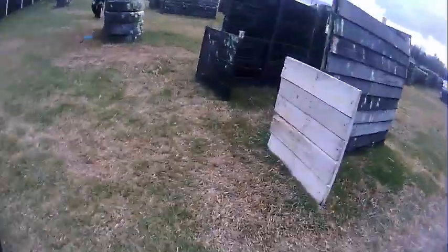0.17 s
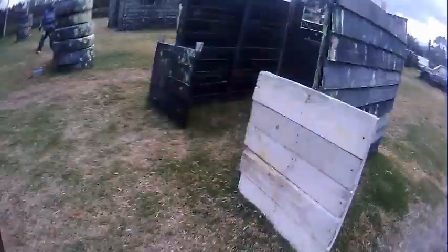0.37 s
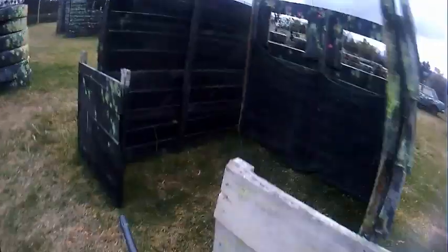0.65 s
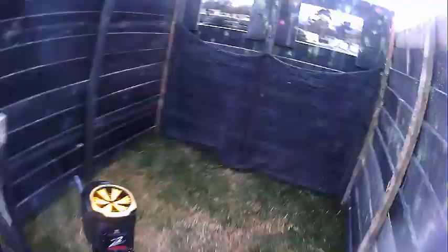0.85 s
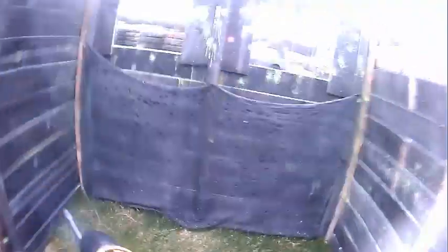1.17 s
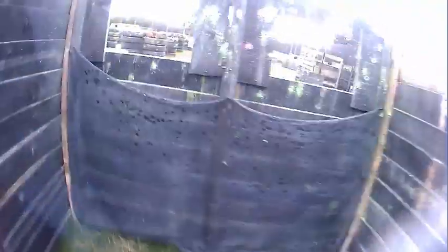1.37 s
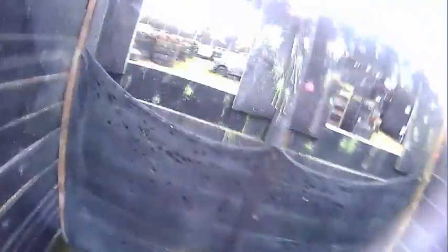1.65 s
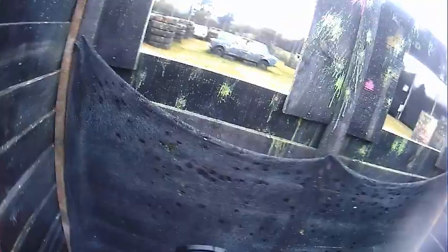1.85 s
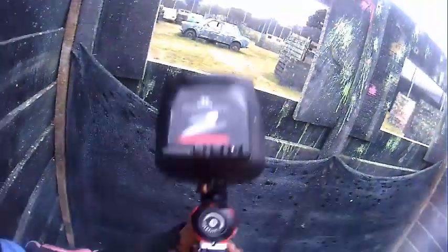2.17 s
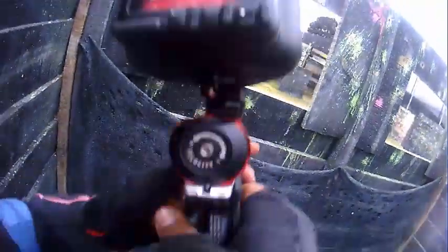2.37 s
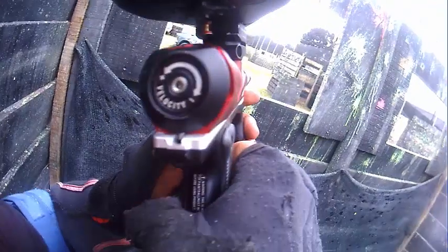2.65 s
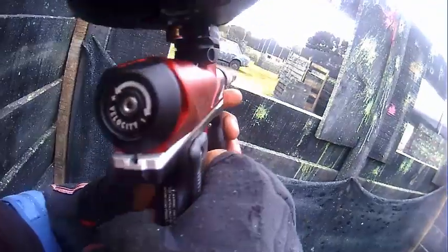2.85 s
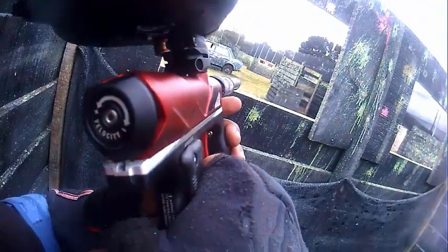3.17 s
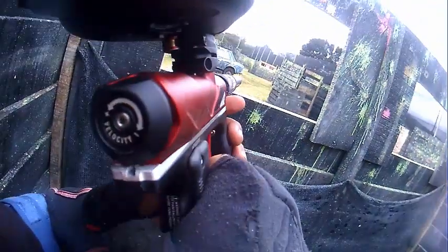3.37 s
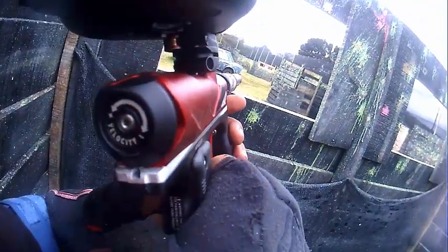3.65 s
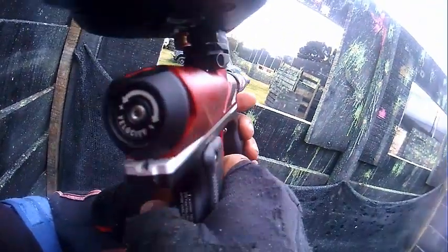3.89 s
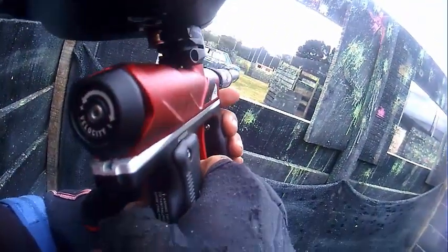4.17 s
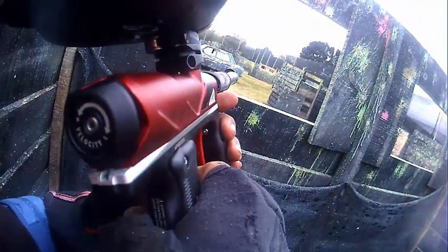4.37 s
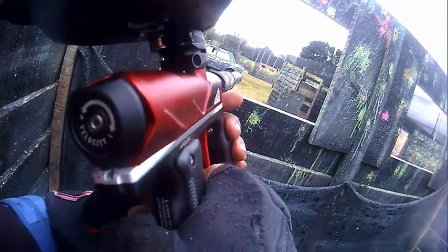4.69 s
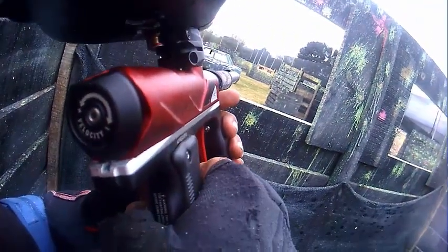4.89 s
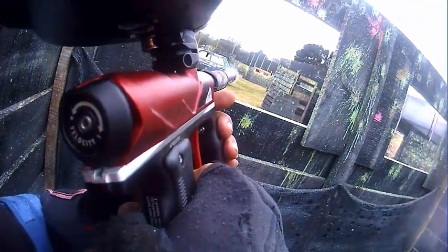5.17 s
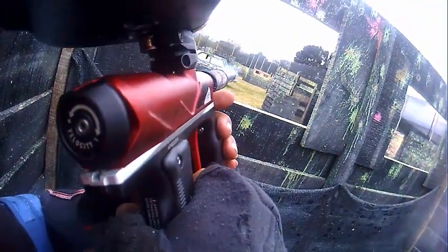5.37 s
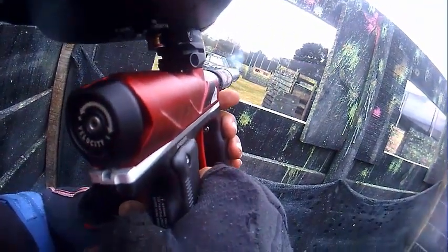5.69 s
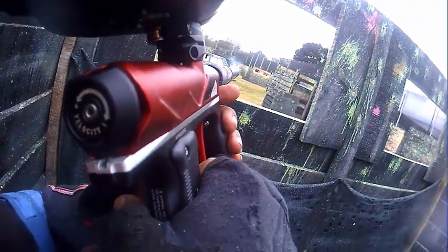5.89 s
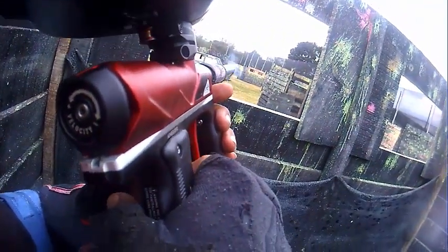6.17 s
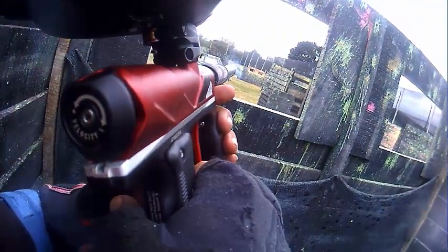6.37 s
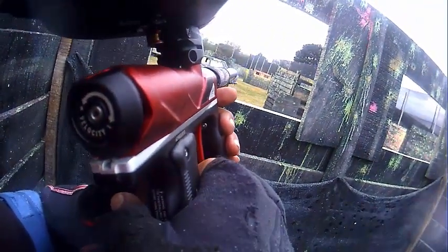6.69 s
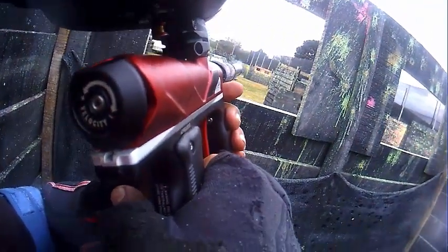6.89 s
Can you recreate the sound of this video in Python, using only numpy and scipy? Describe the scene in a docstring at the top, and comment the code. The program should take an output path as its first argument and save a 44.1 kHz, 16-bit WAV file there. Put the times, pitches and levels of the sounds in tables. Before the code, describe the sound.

For the first second, straps and clothing scrape close against a head-worn microphone, with muffled footsteps, a swish of dry grass, small hard knocks from the hopper and low buffets of air. Lighter rubbing and more steps follow, with a heavier thump near 1.7 seconds and a burst of scuffs and knocks from about 2.3 to 2.8 seconds. Faint, dull pops from distant markers come at around 1 to 1.5 seconds and again in quick runs from 2.7 to 5 seconds, over the soft low rumble of an open field. At 5.1 seconds a paintball marker starts firing right beside the microphone: fifteen shots, quickening to about eight a second and running until the end at 7 seconds. These are by far the loudest sounds, each a sharp crack with a thump and a puff of air, slightly distorted, with tight plank reflections and a faint loader rattle between them.

```python
"""A paintball marker fires a fast string in a plank shelter, heard at the player's head-mounted camera.
Each shot is a solenoid tick, bolt strokes that excite damped modes, and a turbulent puff of air;
the planks reflect it and the camera's slow converter overloads. Before the string, as the player walks
in and raises the marker, straps and clothing rub on the plastic housing, steps thump through it,
grass swishes and air buffets the microphone. Dull pops, most likely other markers, cross the field."""
import sys
import numpy as np
from scipy import signal
from scipy.fft import rfft, irfft
from scipy.io import wavfile

SR = 44100
rng = np.random.default_rng(int(sys.argv[2]) if len(sys.argv) > 2 else 0)


def generate_wav(sig):
    """Save sig (samples, or channels by samples) to the path in sys.argv[1] as 16-bit PCM at SR."""
    pcm = np.round(np.clip(np.atleast_2d(sig).T, -1, 1) * 32767).astype(np.int16)
    wavfile.write(sys.argv[1], SR, pcm)


N = 310023

# the string of shots: (t/s, thump level/dB, air level/dB, loader rattle level/dB)
SHOTS = [(5.1098, 0.5, -0.4, -61), (5.26, -2, -0.7, -42.5), (5.465, -3, 2.1, -42.5), (5.613, -1.1, 0, -48),
         (5.7353, -2.4, 1.5, -43), (5.8458, -2.5, 1.5, -41.5), (5.9638, -0.5, 2, -43),
         (6.0882, -2.7, 0.3, -50), (6.2211, -2.5, 0, -53), (6.346, -3, 0, -43.5), (6.468, -0.8, 1.1, -40.5),
         (6.5804, -1.5, 1.2, -47), (6.7106, -2, -0.5, -43), (6.8251, -2.1, -3, -39),
         (6.9526, 0.5, -0.2, -42)]
# one firing cycle, pulling and pushing in turn: (t/s from the shot, level/dB, softness/s)
BOLT_STROKES = [(-.0002, 3.6, .00055), (.0023, 6.2, .00032), (.0062, -8.5, .00026), (.0104, -21, .0001)]
# modes excited by a shot: (f/Hz, level/dB, t60/s)
MARKER_MODES = [(101.9, -3.5, 0.048), (171, -10, 0.067), (203, 2.2, 0.0098), (198, -49, 0.04),
                (223.5, -18.5, 0.1), (331.1, -3.5, 0.061), (355, -4, 0.021), (490, -29.5, 0.097),
                (513.5, -13, 0.11), (592, -30, 0.11), (720, -29, .09), (835, -20.5, 0.031),
                (1417, -18, 0.042), (1814, 3, .015), (1800, -2.5, 0.12), (2086, -9.5, 0.096),
                (2140, -15, 0.025), (2280, -6, 0.043), (2863, 4, 0.017)]
# reflections from the planks: (delay/s, level/dB)
PLANK_ECHOES = [(.0168, -12.5), (.0216, -17.7)]
# resonances of the escaping air: (f/Hz, bandwidth/Hz, level/dB)
AIR_RESONANCES = [(570, 330, 3), (1370, 99, 11), (1725, 151, 17.5), (2162, 115, 17.5), (2837, 580, 9),
                  (3790, 590, 5)]
# turbulence at the muzzle: (f/Hz, spectral level/dB)
PUFF_SPECTRUM = [(20, -11.5), (60, 7.5), (150, -0.5), (350, -5), (480, -5), (640, -15.5), (1000, -23.5),
                 (3000, -37)]

# strap and sleeve sliding over the camera: (t/s, duration/s, drag level/dB, scratch level/dB)
RUBS = [(-0.04, 0.064, -43, -38), (0.022, 0.089, -30, -34), (0.161, 0.19, -31.5, -37.5),
        (0.378, .23, -34, -43.5), (0.582, 0.1, -31.5, -35), (0.77, 0.12, -30, -41.5),
        (1.007, 0.27, -41.5, -49.5), (1.35, 0.86, -46.5, -58), (1.725, 0.14, -31.5, -43),
        (1.987, 0.13, -42.5, -49.5), (2.344, 0.12, -28.5, -33), (2.447, 0.027, -52, -39),
        (2.587, 0.17, -46, -47.5)]
# sudden catches of strap and sleeve: (t/s, drag level/dB, scratch level/dB)
SCUFFS = [(0.038, -28, -33), (0.085, -23, -28), (0.283, -16, -27.5), (0.634, -31, -31), (0.8, -33, -40),
          (0.815, -17, -34), (0.876, -22, -37), (1.758, -23.5, -52), (1.8, -38, -45), (1.993, -39, -46),
          (2.1, -44, -47), (2.327, -18.5, -28), (2.371, -16, -34), (2.387, -15.5, -31)]
# resonances of the camera housing: (f/Hz, bandwidth/Hz, level/dB)
HOUSING_RESONANCES = [(516, 124, -6.5), (1516, 350, -6), (1626, 130, 4), (1758, 151, 3),
                      (3200, 1900, -17.5), (4270, 1240, -18)]
# resonances of its mount: (f/Hz, bandwidth/Hz, level/dB)
MOUNT_RESONANCES = [(350, 93, 6), (437, 120, -13.5), (474.5, 102, 15), (540, 350, -6.5), (750, 93, -14)]
# footfalls and bumps: (t/s, level/dB)
STEPS = [(0.107, -10.5), (0.123, -8.5), (0.372, -16.5), (0.44, -15), (0.602, -18), (1.571, -25),
         (1.617, -17), (1.687, -5), (1.99, -18.5), (2.037, -17.5), (2.122, -18), (2.824, -23),
         (4.648, -19.5)]
# modes of a thump carried through the body: (f/Hz, level/dB, t60/s)
STEP_MODES = [(46.6, -8, 0.041), (108, -3.5, 0.027), (168.6, -7, .035), (295, -12, 0.018)]
# thin ring of the housing after a jolt or distant pop: (f/Hz, bandwidth/Hz, level/dB)
JOLT_RESONANCES = [(668, 125, 5), (1690, 130, 7), (1885, 350, 0), (3340, 1240, -13.5)]
# hard knocks, most likely balls in the hopper: (t/s, peak level/dB)
KNOCKS = [(0.098, -23), (0.208, -25), (0.223, -24), (0.645, -31), (0.664, -29), (0.71, -28.5),
          (1.192, -35.5), (1.921, -43), (2.128, -51), (2.229, -39.5), (2.422, -30), (2.435, -29),
          (2.463, -26), (2.477, -34), (2.501, -28), (2.582, -40), (2.619, -40), (2.7, -31), (2.782, -35.5)]
# air pushing on the microphone as the player moves: (t/s, duration/s, level/dB)
GUSTS = [(-0.03, 0.033, -15.5), (0.05, .15, -22), (0.22, 0.5, -29), (0.7, 0.2, -32), (1.01, 0.55, -39),
         (1.55, 0.23, -23.5), (1.91, 0.2, -29.5)]
# rumble of that air: (f/Hz, spectral level/dB)
BUFFET_SPECTRUM = [(12, -31), (20, -14), (37, 3), (70, -5.5), (102, -4), (189, -30.5), (344, -24.5),
                   (400, -21.5), (520, -61), (880, -120)]
# strides through dry grass: (t/s, duration/s, level/dB)
STRIDES = [(0.03, 0.07, -37.5), (0.2, 0.18, -46), (0.49, 0.15, -42.5), (0.78, 0.075, -40.5)]
# resonances of the brushed blades: (f/Hz, bandwidth/Hz, level/dB)
GRASS_RESONANCES = [(870, 260, -8), (1295, 164, 6), (1610, 190, 6.5), (3800, 2000, -17)]

# pops across the field: (t/s, level/dB)
FAR_POPS = [(1.018, -25), (1.164, -26.5), (1.296, -39), (1.405, -26.5), (1.508, -28.5), (2.741, -26),
            (2.856, -26), (2.96, -27), (3.059, -26), (3.164, -27), (3.267, -27), (3.614, -27.5),
            (3.714, -28), (3.825, -29), (3.931, -30), (4.171, -28), (4.273, -29), (4.492, -27),
            (4.594, -28.5), (4.646, -22.5), (4.831, -28.5), (4.938, -27.5)]
# modes of a distant pop: (f/Hz, level/dB, t60/s)
FAR_MODES = [(92, -6.5, 0.054), (172, -11, 0.085), (296, -9, 0.065), (510, -6, 0.053)]
# ambient noise of the open field: (f/Hz, spectral level/dB)
FIELD_SPECTRUM = [(12, -50), (20, -0.5), (35, -2), (49, 1.5), (137, -13), (188, -11), (204, -15),
                  (287, -16), (474, -30.5), (1070, -40), (1190, -41.5), (1360, -37), (1970, -38.5),
                  (2190, -41), (3200, -42.5), (5000, -48)]
# its slow rise and fall: (t/s, level/dB)
FIELD_LEVEL = [(0, -39), (2.3, -33), (2.8, -36), (5, -36), (7.03, -32)]

CONVERTER_HZ, CUTOFF_HZ = 8000, 11100


def marker_body():
    """Impact excitation: solenoid, bolt and valve set damped modes ringing; the planks reflect them."""
    t, thump_db, _, _ = np.transpose(SHOTS)
    force = soften(clicks(t - .0108, -from_db(thump_db - 24)), .00025)   # the solenoid ticks first
    for k, (delay, db, softness) in enumerate(BOLT_STROKES):
        jitter_s, jitter_db = (rng.standard_normal((len(t), 2)) * [.00008, .9]).T
        impulses = (-1) ** (k + 1) * from_db(thump_db + db + jitter_db)
        force += soften(clicks(t + delay + jitter_s, impulses), softness)
    direct = ring(force, MARKER_MODES)
    n = np.arange(N)
    echoes = sum(from_db(db) * np.interp(n - delay * SR, n, direct, left=0) for delay, db in PLANK_ECHOES)
    return direct + butter(echoes, 2500, "low")


def marker_air():
    """Jet noise: the solenoid vents, the bolt leaks, and the ball leaves with a crack, hiss and puff."""
    t, _, air_db, _ = np.transpose(SHOTS)
    vent = fade(clicks(t - .01, from_db(air_db - 29)), t60=.0086)
    leak = soften(fade(clicks(t - .001, from_db(air_db - 19.5)), t60=.053), .00027)
    crack = fade(clicks(t + .0019, from_db(air_db - 14)), t60=.012)
    sputter = from_db(7.2 * np.tanh(drift(74)))
    hiss = fade(clicks(t + .0042, from_db(air_db - 26)), t60=.086) * sputter
    puff = soften(fade(clicks(t + .00314, from_db(air_db - 10.5)), t60=.11), .00034)
    jet = (vent + leak + crack + hiss) * rng.standard_normal(N)
    return resonate(jet, AIR_RESONANCES) + puff * noise(PUFF_SPECTRUM)


def loader_rattle():
    """Random collisions: the force of the loader stirring its balls from just after each shot."""
    t, _, _, db = np.transpose(SHOTS)
    starts = t + .024
    durations = np.append(t[1:], N / SR) - starts
    effort = swells(zip(starts, durations, db), attack_s=.044, t60=.43)
    return effort * slips(per_s=3300, spread_db=0, clump_db=.5, clump_hz=82)


def rubbing(rattle):
    """Stick-slip friction: drags shake the mount, scratches ring the housing; the rattle drives both."""
    rubs = np.array(RUBS)
    t, drag_db, scratch_db = np.transpose(SCUFFS)
    drag = from_db(1) * swells(rubs[:, [0, 1, 2]], attack_s=.042, t60=.38)
    drag += fade(clicks(t, from_db(drag_db - 4.5)), t60=.061)
    scratch = swells(rubs[:, [0, 1, 3]], attack_s=.042, t60=.38)
    scratch += fade(clicks(t, from_db(scratch_db - 9)), t60=.11)
    shake = drag * slips(per_s=2000, spread_db=1, clump_db=-.5, clump_hz=18)
    scrape = scratch * slips(per_s=3900, spread_db=3, clump_db=3, clump_hz=78)
    mount = resonate(shake + from_db(6.5) * rattle, MOUNT_RESONANCES)
    padded = butter(butter(mount, 330, "high"), 540, "low")   # the padded mount passes no treble
    return padded + resonate(scrape + from_db(2.5) * rattle, HOUSING_RESONANCES)


def steps():
    """Body conduction: footfalls arrive as soft thumps that jolt the housing."""
    t, db = np.transpose(STEPS)
    force = soften(clicks(t, from_db(db + 9)), .00043)
    jolt = fade(clicks(t + .0033, from_db(db - 37.5)), t60=.23) * rng.standard_normal(N)
    return ring(force, STEP_MODES) + resonate(jolt, JOLT_RESONANCES)


def hopper(centre_hz=1720, spread_hz=100, rise_s=.0018):
    """Shell vibration: loose balls ring the hopper briefly, each at a slightly different frequency."""
    t = np.arange(int(.04 * SR)) / SR
    envelope = t / rise_s * np.exp(1 - t / rise_s)
    out = np.zeros(N)
    for onset, db in KNOCKS:
        start = int(onset * SR)
        hz = centre_hz + spread_hz * rng.uniform(-1, 1)
        out[start:start + len(t)] += from_db(db) * envelope * np.sin(2 * np.pi * hz * t)
    return out


def buffeting():
    """Turbulent pressure: moving air rumbles at the microphone port."""
    return swells(GUSTS, attack_s=.034, t60=.24) * noise(BUFFET_SPECTRUM)


def grass():
    """Friction noise: boots brush dry blades, whose many small slips merge into a swish."""
    blades = slips(per_s=4000, spread_db=2, clump_db=-1, clump_hz=32)
    return swells(STRIDES, attack_s=.019, t60=.44) * resonate(blades, GRASS_RESONANCES)


def far_pops():
    """Pressure pulses: a dull pull and push excite low modes, and a faint crack rings the housing."""
    t, db = np.transpose(FAR_POPS)
    pull = clicks(t + .00019, -from_db(db + 5.5))
    push = clicks(t + .00591, from_db(db + 12.5))
    crack = fade(clicks(t + .0011, from_db(db - 18.5)), t60=.16) * rng.standard_normal(N)
    return ring(soften(pull + push, .00089), FAR_MODES) + resonate(crack, JOLT_RESONANCES)


def open_field():
    """Ambient noise: a low rumble under slow amplitude modulation."""
    return level(FIELD_LEVEL) * noise(FIELD_SPECTRUM)


def from_db(db):
    """Amplitude ratio: a factor of ten for every 20 dB."""
    return 10 ** (np.asarray(db) / 20)


def rms_one(x):
    """Normalisation to an rms of 1."""
    return x / np.sqrt(np.mean(x ** 2) + 1e-20)


def level(rows):
    """Gain by interpolation of (t/s, level/dB) rows, silent outside them."""
    t, db = np.transpose(rows)
    return from_db(np.interp(np.arange(N) / SR, t, db, left=-np.inf, right=-np.inf))


def swells(rows, attack_s, t60):
    """Power summation of envelopes that rise, hold and decay, from (t/s, duration/s, level/dB) rows."""
    t, power = np.arange(N) / SR, np.zeros(N)
    for start, duration, db in rows:
        rise = np.clip((t - start) / attack_s, 0, 1)
        fall = np.clip((t - start - duration) / t60, 0, 2)
        power += (rise * from_db(db - 60 * fall)) ** 2
    return np.sqrt(power)


def butter(x, hz, kind):
    """Causal second-order low- or high-pass filtering."""
    return signal.sosfilt(signal.butter(2, hz, kind, fs=SR, output="sos"), x + 1e-18)


def drift(hz):
    """Random fluctuation: low-passed noise, rms 1."""
    return rms_one(butter(rng.standard_normal(N + SR), hz, "low")[SR:])


def noise(spectrum):
    """Spectral shaping of white noise by (f/Hz, level/dB) rows, rms 1."""
    hz, db = np.transpose(spectrum)
    bins = np.maximum(np.fft.rfftfreq(N, 1 / SR), 1)
    gains = from_db(np.interp(np.log(bins), np.log(hz), db))
    return rms_one(irfft(rfft(rng.standard_normal(N)) * gains, N))


def clicks(times, gains):
    """Impulse train: one weighted sample at each time."""
    out = np.zeros(N)
    np.add.at(out, np.clip(np.round(times * SR).astype(int), 0, N - 1), gains)
    return out


def slips(per_s, spread_db, clump_db, clump_hz):
    """Random point process: tiny releases of uneven size, stronger in clumps, rms 1."""
    sizes = rng.standard_normal(N) * from_db(spread_db * np.minimum(rng.exponential(1, N), 3))
    released = rng.random(N) < per_s / SR
    clumps = from_db(clump_db * np.tanh(drift(clump_hz)))
    return rms_one(sizes * released * clumps)


def soften(x, seconds):
    """Compliance: each impulse spreads into a rounded pulse of the same area."""
    r = np.exp(-1 / (seconds * SR))
    return signal.lfilter([(1 - r) ** 2], [1, -2 * r, r * r], x + 1e-18)


def fade(x, t60):
    """Exponential decay: each impulse starts an envelope that falls 60 dB in t60 seconds."""
    return signal.lfilter([1], [1, -from_db(-60 / (t60 * SR))], x + 1e-18)


def ring(x, modes):
    """Modal superposition: damped sines of alternating sign."""
    out = np.zeros(N)
    for k, (hz, db, t60) in enumerate(modes):
        r, w = from_db(-60 / (t60 * SR)), 2 * np.pi * hz / SR
        mode = signal.lfilter([0, np.sin(w)], [1, -2 * r * np.cos(w), r * r], x + 1e-18)
        out += (-1) ** k * from_db(db) * mode
    return out


def resonate(x, peaks):
    """Parallel resonances of alternating sign that roughly keep the power of white noise."""
    out, power = np.zeros(N), 0
    for k, (hz, width, db) in enumerate(peaks):
        r, w = np.exp(-np.pi * width / SR), 2 * np.pi * hz / SR
        gain = (-1) ** k * from_db(db) * (1 - r * r) / 2
        out += gain * signal.lfilter([1, 0, -1], [1, -2 * r * np.cos(w), r * r], x + 1e-18)
        power += from_db(db) ** 2 * (1 - r)
    return out / np.sqrt(power)


def slow_converter(x):
    """Sample and hold: the spectrum gains thin mirror images on both sides of the converter's rate."""
    t = np.arange(N + 1) / SR
    instants = np.arange(0, t[-1] + 2 / CONVERTER_HZ, 1 / CONVERTER_HZ)
    held = np.interp(instants, t[:-1], butter(x, CONVERTER_HZ / 2, "low"))
    area = (np.cumsum(held) - held) / CONVERTER_HZ
    return np.diff(np.interp(t, instants, area)) * SR   # mean of the staircase over each output sample


def scene():
    """Superposition of marker, movement and field at one microphone."""
    marker = marker_body() + marker_air()
    movement = rubbing(loader_rattle()) + hopper() + grass() + steps() + buffeting()
    background = open_field() + far_pops()
    return (marker + movement + background)[None]


def record(dry):
    """Clipping and imaging: the converter overloads on shots and adds a glassy treble; the top is cut."""
    stepped = slow_converter(np.clip(dry[0], -1.02, 1.02))
    band_limit = signal.ellip(12, .2, 80, CUTOFF_HZ, fs=SR, output="sos")
    clipped = np.clip(signal.sosfilt(band_limit, stepped), -1, 1)   # the filter's overshoot clips too
    output_lowpass = signal.ellip(8, .1, 60, 15800, fs=SR, output="sos")
    return signal.sosfilt(output_lowpass, clipped)[None]


dry = scene()
out = record(dry)
generate_wav(out)
```